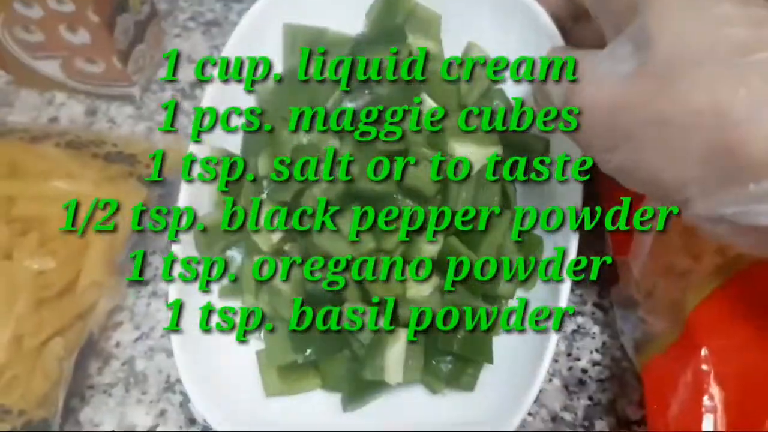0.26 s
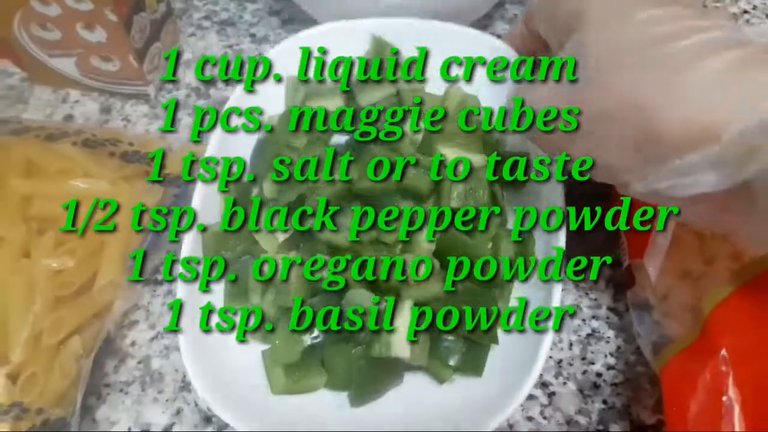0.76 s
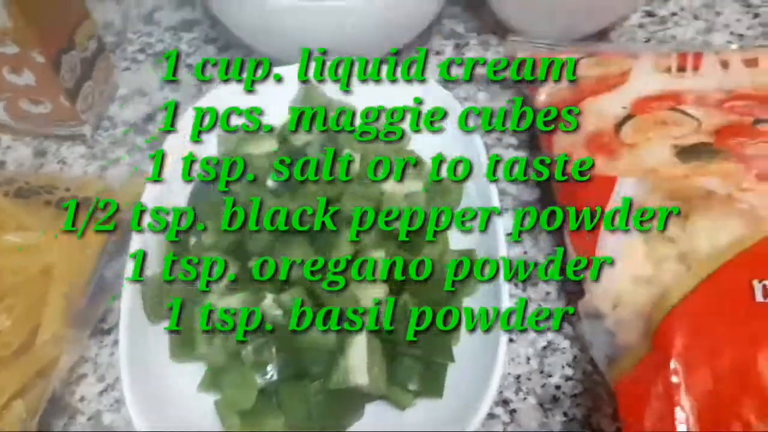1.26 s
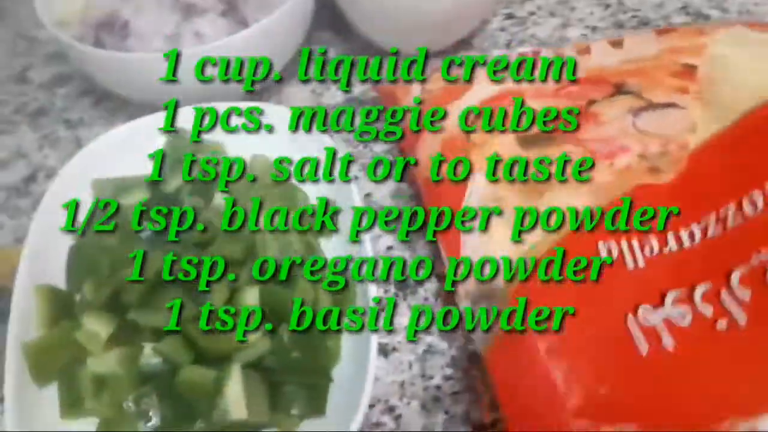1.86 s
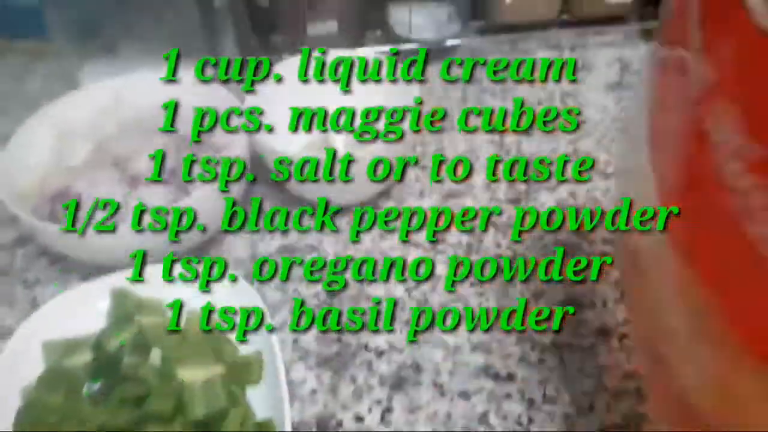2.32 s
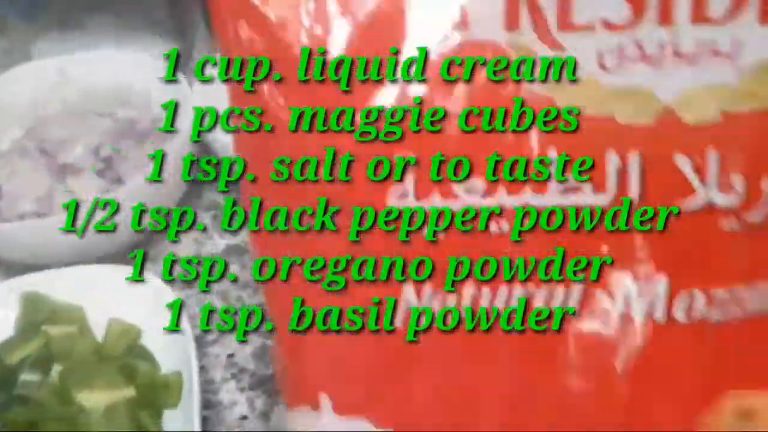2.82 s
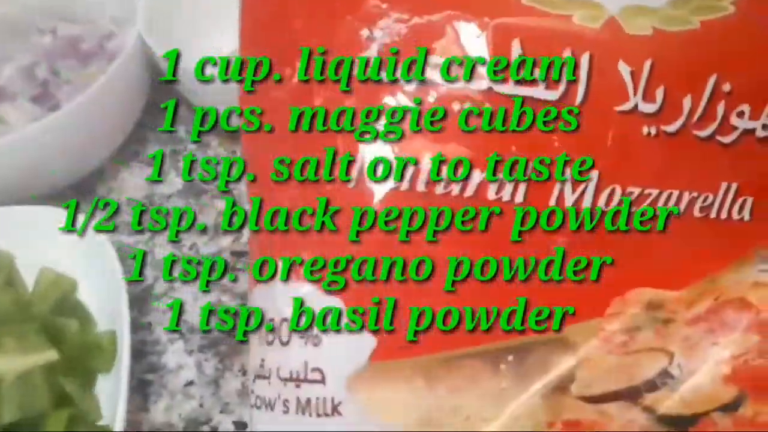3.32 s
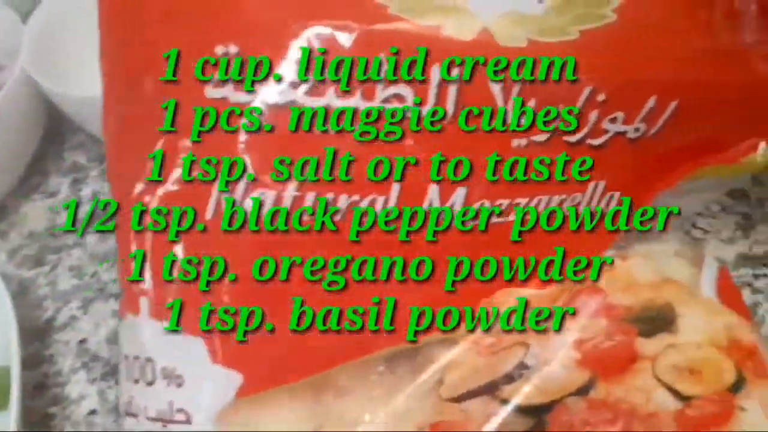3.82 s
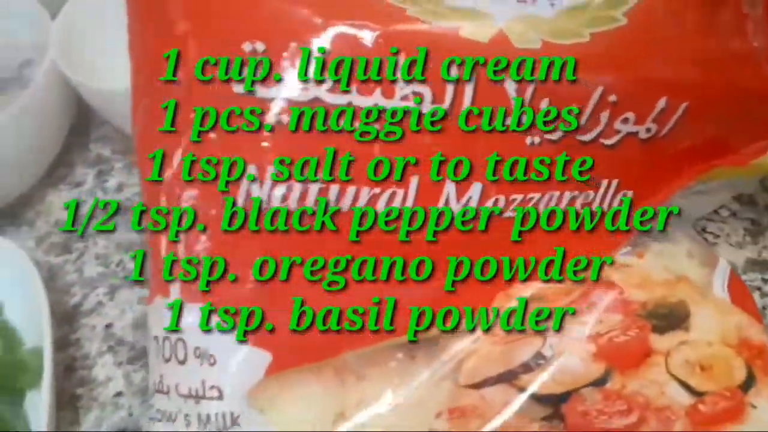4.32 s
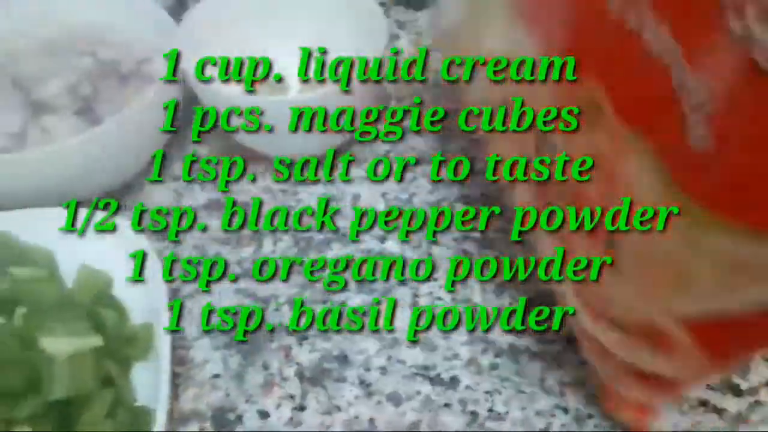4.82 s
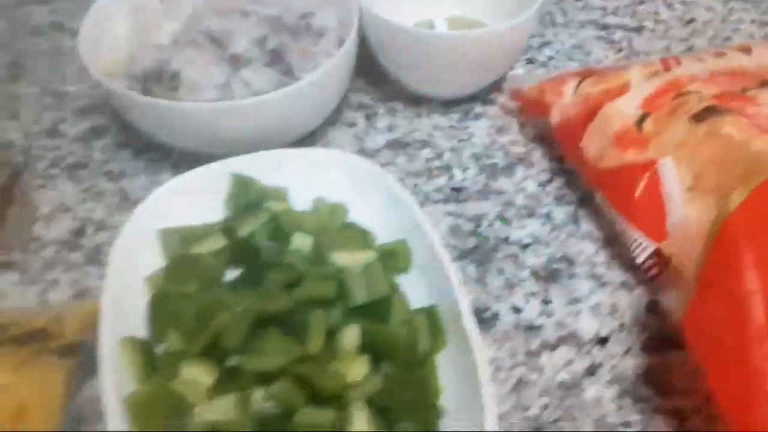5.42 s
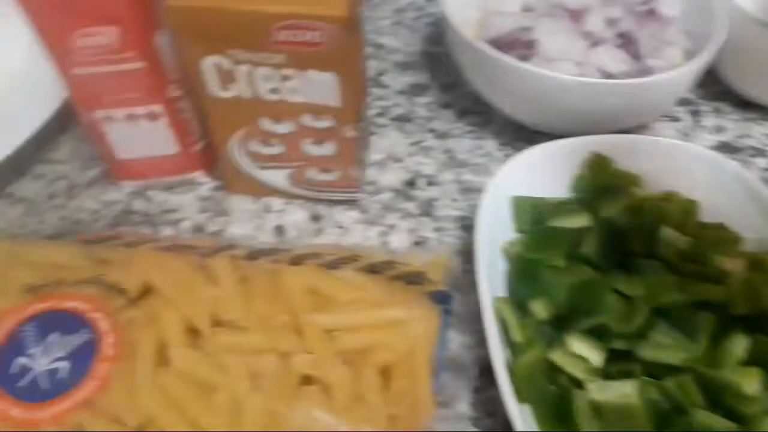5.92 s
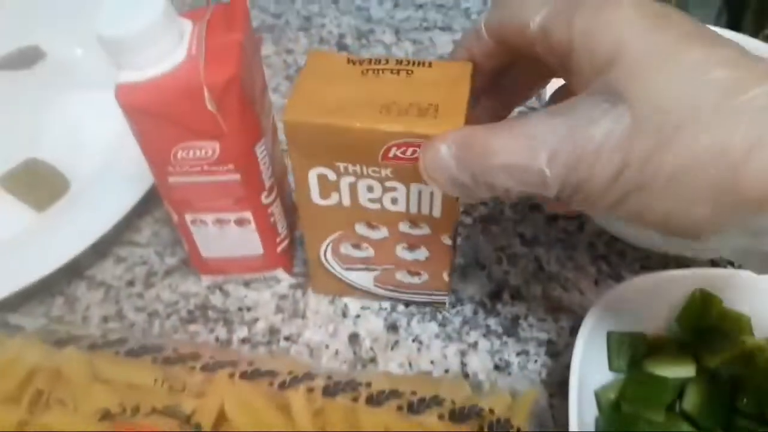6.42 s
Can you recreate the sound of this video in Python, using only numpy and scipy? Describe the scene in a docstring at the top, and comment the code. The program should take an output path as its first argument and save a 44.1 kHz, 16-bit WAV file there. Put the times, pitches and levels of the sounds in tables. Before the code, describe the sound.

Throughout about 6.6 seconds, a fridge compressor runs in a small tiled kitchen: a low, slightly wavering, beating hum with soft airy hiss and faint unsteady whines. At about 0.76 s a china dish rocks on the stone counter with a dull knock and tiny follow-ups; at 0.9 s it clinks against a bowl, bright, quickly damped, with a short room tail. Thin glove ticks come near 0.87 and 1.4 s. From about 1.75 to 3 s a filled plastic bag is gripped, crinkling with sharp snaps, fine crackle and soft inner thuds, with smooth rubbing strokes near 2.5 s. From 3.1 to 4.4 s only sparse faint pats remain over the hum. From 4.5 s the film rubs and crackles again, and at 5.08 s the bag drops with a dense crunchy crash and soft thud, settling by 5.4 s. Small ticks near 5.75 s, then hum alone. Close handheld stereo microphone, bag leaning right.

```python
"""A fridge compressor hums and hisses throughout in a small tiled kitchen: tones plus shaped noise.
Near 0.8 s a china dish rocks on stone and clinks on a bowl: damped modes and a noisy crack.
A glove gives thin ticks at 0.87, 1.41 and 5.8 s. From 1.5 s a filled plastic bag is gripped and crinkles:
scattered clicks, pitched snaps, hiss, soft thuds. From 2.5 s, and again from 4.5 s, it slips through the
gloved hand in strokes of fine crackle; at 5.08 s it drops on the counter: a dense crash of clicks and a thud."""
import sys
import numpy as np
from scipy import signal
from scipy.fft import rfft, irfft
from scipy.io import wavfile
from scipy.ndimage import uniform_filter1d

SR = 44100
rng = np.random.default_rng(int(sys.argv[2]) if len(sys.argv) > 2 else 0)


def to_wav(sig):
    """Store sig (one row per channel, or 1-D mono) as 16-bit WAV at the path in sys.argv[1].

    Samples outside -1..1 are clipped; the rate is SR.
    """
    pcm = np.clip(np.atleast_2d(sig), -1, 1) * 32767
    pcm = np.round(pcm).astype(np.int16)
    wavfile.write(sys.argv[1], SR, pcm.T)  # frames by channels


N = 294147
TIME = np.arange(N) / SR


def gain_of(db):
    """Decibels to amplitude."""
    return 10 ** (np.asarray(db) / 20)


def evened(x):
    """Scales to rms 1."""
    return x / np.sqrt(np.mean(x ** 2) + 1e-20)


def read(points, hz):
    """Interpolates a table on a log-frequency axis."""
    point_hz, value = np.transpose(points)
    return np.interp(np.log(hz + 1), np.log(point_hz + 1), value)


def bins(x):
    """Frequencies of the spectrum of x, Hz."""
    return np.fft.rfftfreq(x.shape[-1], 1 / SR)


def coloured(x, points):
    """Filters x by a spectrum in dB."""
    return irfft(rfft(x) * gain_of(read(points, bins(x))), x.shape[-1])


def passed(x, hz, kind, order=2):
    """Causal Butterworth low-pass or high-pass."""
    return signal.sosfilt(signal.butter(order, hz, kind, fs=SR, output="sos"), x)


def panned(lean_db):
    """Left and right gains; lean_db is left over right."""
    return gain_of(np.array([lean_db, -lean_db]).reshape(2, -1) / 2)


def add(mix, start_s, sound):
    """Mixes a sound in at start_s."""
    part = mix[:, round(start_s * SR):][:, :sound.shape[1]]
    part += sound[:, :part.shape[1]]


def drift(rate_hz):
    """Random wandering of rms 1: 20 sines up to rate_hz, slow ones strongest."""
    # 105 knots per s: sines above 52 Hz fold down
    knot_s = np.linspace(0, N / SR, 700)
    waves = 0
    for hz in np.geomspace(rate_hz / 10, rate_hz, 20):
        waves = waves + np.sin(2 * np.pi * (hz * knot_s + rng.random())) / np.sqrt(hz)
    return np.interp(TIME, knot_s, evened(waves))


def tone(hz, waver=0.014, fading_db=2.0):
    """One line; the shorter its wavelength, the more it wavers as the microphone moves."""
    phase = 2 * np.pi * (hz * TIME + rng.random()) + waver * np.sqrt(hz) * drift(1.998)
    fading = gain_of(fading_db * min(hz / 1000, 1) * drift(1.895))
    return fading * np.sqrt(2) * np.sin(phase)


def tones(base_hz, lines):
    """Harmonics of one repeating cycle."""
    return sum(panned(lean_db) * gain_of(db) * tone(multiple * base_hz) for multiple, db, lean_db in lines)


MAINS_HZ, SHAFT_HZ = 49.985, 47.905
# magnetic hum of the motor: (mains_multiple, level_db, lean_db)
MAINS = [(2, 0, -3.7), (4, -16.5, 1), (6, -11.5, .5), (8, -23, -3), (10, -27, -3), (12, -27, 0)]
# piston vibration: (shaft_multiple, level_db, lean_db)
PISTON = [(3, -22, -4), (5, 0, -2.2), (7, -18, -7), (8, -14.5, -4), (9, -27, -11.5), (10, -31.5, -11)]
# microphone moving through the standing waves of the room: (time_s, mains_db, piston_db)
HUM = [(0, -44.7, -40.3), (0.25, -43.0, -38.5), (0.7, -43.0, -38.4), (1.0, -45.5, -41.1),
       (1.65, -46.0, -43.9), (2.15, -45.7, -40.9), (2.45, -44.4, -43.0), (2.9, -44.9, -42.4),
       (3.4, -44.3, -44.4), (3.95, -43.0, -42.4), (4.25, -43.4, -44.8), (4.8, -43.0, -40.0),
       (5.3, -43.2, -44.0), (5.68, -43.1, -38.7), (6.12, -42.7, -39.4), (6.3, -42.3, -41.7),
       (6.6, -42.3, -38.9)]
# thin whines that swell as the microphone passes: (shaft_multiple, level_db, loudest_s, half_width_s)
WHINE = [(16, -71, 5.9, .7), (18, -70, 5.9, .6), (21, -70, 3.9, .55), (21, -68.5, 5.75, .45),
         (22, -70.5, 3.9, .9), (22, -67, 5.7, .6), (24, -66, .5, 1.2), (27, -71, .4, .7),
         (28, -72, .47, 1.2), (28, -74, 4.6, 1.6), (30, -69, 3.7, .8), (41, -78, .34, 1.1),
         (69, -78, 4.1, .6)]
WHINE_FLICKER_DB, WHINE_FLICKER_HZ = 2, 12  # the whines come and go unsteadily


def compressor():
    """Mains hum and the slightly slower piston beat against each other under a faint whine."""
    time_s, mains_db, piston_db = np.transpose(HUM)
    mains = gain_of(np.interp(TIME, time_s, mains_db)) * tones(MAINS_HZ, MAINS)
    piston = gain_of(np.interp(TIME, time_s, piston_db)) * tones(SHAFT_HZ, PISTON)
    whine = np.zeros(N)
    for multiple, level_db, loudest_s, half_width_s in WHINE:
        swell = np.exp(-((TIME - loudest_s) / half_width_s) ** 2)
        flicker = gain_of(WHINE_FLICKER_DB * drift(WHINE_FLICKER_HZ))
        whine += gain_of(level_db) * swell * flicker * tone(multiple * SHAFT_HZ, waver=0.11)
    return mains + piston + whine * panned(-2)


# rush of the running machine: (freq_hz, density_db_per_hz)
RUSH = [(25, -25), (50, -16), (75, -12), (108, 0.5), (160, 6.5), (220, -2), (315, 1), (440, -12),
        (650, -14.3), (830, -13), (1200, -14.8), (1700, -21), (3000, -25), (4800, -34), (6100, -27),
        (7600, -37.5), (10000, -41.5), (15000, -45.5)]
# ringing of the compressor shell: (freq_hz, width_hz, over_rush_db)
SHELL = [(2992, 42, 8), (3298, 48, 14), (3940, 120, 7), (5230, 57, 9), (6380, 28, 5), (8260, 200, 7)]
# left-right correlation of the rush, clipped to +-1: (freq_hz, likeness)
LIKENESS = [(60, 7.3), (130, -1.7), (300, 0.7), (640, 0.16), (1400, -0.49), (3000, 0)]
# left-right balance of the rush: (freq_hz, lean_db)
LEAN = [(110, 5), (200, 2.5), (400, -6.5), (1400, -1), (4500, -6), (8000, -1), (14000, 7.5)]


def rush(level_db=-45.0, throb=0.049, follow=0.52, ripple_db=1.06):
    """Machine noise in the room, ringing in the shell; its hiss throbs once per shaft turn."""
    a, b = rfft(rng.standard_normal((2, N)))
    hz = bins(TIME)
    same = np.clip(read(LIKENESS, hz), -1, 1)
    shell_db = sum(db / (1 + (2 * (hz - f) / width_hz) ** 2) for f, width_hz, db in SHELL)
    # countless small resonances of pipes and panels ripple the hiss
    spots_hz = np.arange(0, SR / 2, 45)
    ripple = np.interp(hz, spots_hz, rng.standard_normal(len(spots_hz)))
    panels_db = ripple_db * ripple * np.minimum(hz / 2000, 1)
    stereo = np.array([a, same * a + np.sqrt(1 - same ** 2) * b]) * panned(read(LEAN, hz))
    noise = evened(irfft(stereo * gain_of(read(RUSH, hz) + shell_db + panels_db), N))
    noise += throb * np.sin(2 * np.pi * SHAFT_HZ * TIME) * passed(noise, 1800, "high", order=1)
    # the rush partly follows the level of the mains hum
    time_s, mains_db, _ = np.transpose(HUM)
    return noise * gain_of(level_db + follow * np.interp(TIME, time_s, mains_db - mains_db.mean()))


# reverberation: (freq_hz, t60_s)
KITCHEN = [(200, 1), (1000, 1), (2500, 0.91), (6000, 0.84), (15000, 0.46)]


def kitchen(x, wet_db, early_db=-11):
    """Quick echoes off counter and tiles, then a tail that dies sooner in the treble."""
    taps = rng.standard_normal((2, SR * 2 // 3))
    hz, t, z = signal.stft(taps, SR, nperseg=256)
    decay = gain_of(-60 * t / read(KITCHEN, hz)[:, None])
    tail = signal.istft(z * decay, SR, nperseg=256)[1]
    t = np.arange(tail.shape[1]) / SR
    tail *= np.minimum(t / 0.004, 1)
    hits = rng.random(tail.shape) < 1500 / SR
    early = rng.standard_normal(tail.shape) * hits * (t > .002) * np.exp(-t / 0.0029)
    echo = 0
    for db, part in [(wet_db, tail), (early_db, early)]:
        echo = echo + gain_of(db) * part / np.linalg.norm(part, axis=1, keepdims=True)
    return x + signal.fftconvolve(x, echo, axes=1)[:, :N]


def ringing(modes, t, phase_spread=1):
    """Dying modes; phase differs per microphone by up to phase_spread turns."""
    ring = 0
    for hz, db, t60_s in modes:
        turns = hz * t + phase_spread * rng.random((2, 1))
        ring = ring + gain_of(db - 60 * t / t60_s) * np.sin(2 * np.pi * turns)
    return ring * np.minimum(t / 0.0002, 1)


def burst(t, spread_s, flutter_s, flutter_db, click_db=-5):
    """A sharp click inside a quick noise cluster, then a weaker flutter; energy 1 per channel."""
    cluster = evened(rng.standard_normal((2, len(t))) * t * np.exp(-(t / spread_s) ** 2))
    flutter = evened(rng.standard_normal((2, len(t))) * np.exp(-t / flutter_s))
    # the right click lands up to 12 samples either side of the left
    click = evened(np.array([t == t[30], t == t[rng.integers(18, 42)]]) * 1.)
    out = gain_of(click_db) * click + cluster + gain_of(flutter_db) * flutter
    return out / np.linalg.norm(out, axis=1, keepdims=True)


# dish rocking on the stone: (start_s, level_db)
KNOCKS = [(.7584, -30), (.7765, -42.5), (.7825, -46), (.7896, -44)]
# damped modes of the rocking dish: (freq_hz, level_db, t60_s)
FOOT = [(620, -13, .05), (880, -10, .05), (1020, -14, .05), (1230, -5, .035), (1360, 0, .036),
        (1490, -11, .04), (1700, -16, .04), (2590, -16, .035)]
KNOCK_CONTACT_S = .0008  # the foot meets the stone softly
# china touching china: (start_s, strength_db, ring_offset_db)
CLINKS = [(0.8938, -21.5, -16), (.8990, -31, -6.5)]
# crack of china on china: (freq_hz, density_db_per_hz)
CRACK = [(200, -8), (500, -4), (800, 0), (1400, 6.5), (2300, 5.5), (3200, 2), (4000, -7), (5300, -12),
         (9000, -18), (15000, -23)]
# modes of the china: (freq_hz, level_db, t60_s)
CHINA = [(840, -3, .25), (1007, -16, .25), (1335, -14, .3), (1440, -2, .18), (1560, -11, .3),
         (1760, -12, .3), (1870, -11, .3), (2080, -2, .6), (2230, -10, .4), (2335, -9, .4), (2470, -11, .3),
         (2590, -1, .25), (2853, -6, .3), (2970, -11, .3), (3246, -2, .26), (3354, -3, .14),
         (3795, -18, .3), (4100, -17, .3), (4290, -15, .22), (5130, -12.5, .42), (5260, -11, .15),
         (7170, -15, .3), (8120, -18, .12)]
CONTACT_S, FREE_RING_DB = .007, -10.5  # the contact damps the china quickly; a weaker ring goes on


def dish():
    """Dull knocks as the dish rocks, then a clink: a crack, a short clatter and ringing china."""
    knocks, cracks, rings = np.zeros((3, 2, N))
    t = np.arange(SR // 2) / SR
    soft = 1 - np.exp(-(t / KNOCK_CONTACT_S) ** 2)
    for start_s, level_db in KNOCKS:
        add(knocks, start_s, gain_of(level_db) * soft * ringing(FOOT, t, phase_spread=.15))
    damping = np.exp(-t / CONTACT_S) + gain_of(FREE_RING_DB)
    for start_s, strength_db, ring_offset_db in CLINKS:
        crack = burst(t, spread_s=0.0012, flutter_s=.005, flutter_db=-6, click_db=-2)
        add(cracks, start_s, gain_of(strength_db + 22) * crack)
        add(rings, start_s, gain_of(strength_db + ring_offset_db) * damping * ringing(CHINA, t))
    clink = kitchen(rings, wet_db=-9.5) + kitchen(coloured(cracks, CRACK), wet_db=-9.3)
    return kitchen(knocks, wet_db=-10) * panned(-4) + clink * panned(-1.9)


# brightness of the film as it snaps: (freq_hz, gain_db)
FILM = [(300, 8), (800, -4.5), (2000, 0), (4300, -1.5), (6000, 1), (7600, 3), (9500, -1), (15000, 1)]


def snaps(rows, level_db, treble_db=3):
    """A crease buckles in a click and lesser ones; its facet flutters briefly at its own pitch."""
    out, t = np.zeros((2, N)), np.arange(2048) / SR
    for start_s, strength_db, pitch_hz, bright_db, lean_db in rows:
        buckle = burst(t, spread_s=0.0015, flutter_s=0.006, flutter_db=-9, click_db=0.5)
        facet = passed(passed(buckle, pitch_hz * 0.37, "high"), pitch_hz * 1.8, "low")
        facet = passed(evened(facet), 6600, "low", order=5)
        ring = evened(ringing([(pitch_hz, 0, 12 / pitch_hz)], t))
        facet = evened(facet + 0.42 * ring)
        edge = gain_of(bright_db + treble_db) * evened(passed(buckle, 4000, "high", order=1))
        # the sharp edge reaches both microphones more evenly than the facet's tone
        snap = facet * panned(lean_db - 1) + edge * panned(0.41 * lean_db + 4)
        add(out, start_s, gain_of(strength_db + level_db) * evened(snap))
    return coloured(out, FILM)


# thin ticks of the glove: (start_s, strength_db, pitch_hz, treble_db, lean_db)
GLOVE = [(.8675, -34, 4200, -3, -5), (1.4145, -42, 7000, 16, -5), (5.799, -39.5, 3500, -22, -6)]


def glove():
    """Thin ticks, each buckling like a small crease."""
    return snaps(GLOVE, level_db=-20.5)


def click_sizes(per_s, spread_db):
    """Random clicks at per_s (scalar), sizes spread exponentially in dB up to 3 * spread_db."""
    hits = rng.random(N) < per_s / SR
    return hits * gain_of(spread_db * np.minimum(rng.exponential(1, N), 3))


def grains(per_s, spread_db, cycles, low_hz, high_hz, count):
    """Tiny pitched buckles; small bright ones are more frequent than large dull ones."""
    out, t = np.zeros((2, N)), np.arange(700) / SR
    pitches_hz = np.geomspace(low_hz, high_hz, count)
    for hz in pitches_hz:
        age = t * hz / cycles
        wave = np.sin(2 * np.pi * (hz * t + rng.random((2, 1))))
        grain = np.sqrt(hz) * age * np.exp(-age) * wave
        clicks = click_sizes(per_s * hz / pitches_hz.sum(), spread_db)
        out += signal.oaconvolve(clicks[None], grain, axes=1)[:, :N]
    return evened(out)


def fizz(colour, per_s, spread_db):
    """Thousands of toneless micro-clicks from all over the film merge into a fine, even crackle."""
    return evened(coloured(click_sizes(per_s, spread_db) * rng.standard_normal((2, N)), colour))


# sliding film: (freq_hz, density_db_per_hz)
SLIDE = [(1000, -4), (3500, 9), (6500, 5), (9500, 0.5), (12000, 3), (15000, 1.5)]


def sliding_hiss():
    """Sliding film: shaped noise with a slight flicker in level."""
    return evened(coloured(rng.standard_normal((2, N)), SLIDE)) * gain_of(0.9 * drift(40))


def rustle(rows, crackle, hiss, attack_s, release_db_per_s, lean_db):
    """Each move swells, holds and dies, driving the crackle and the sliding hiss."""
    crumpling, sliding = np.zeros((2, N))
    for start_s, length_s, crumple_db, slide_db in rows:
        attack = np.clip((TIME - start_s) / attack_s, 0, 1)
        shape = attack * gain_of(-release_db_per_s * np.maximum(TIME - start_s - length_s, 0))
        crumpling = np.maximum(crumpling, gain_of(crumple_db) * shape)
        sliding = np.maximum(sliding, gain_of(slide_db) * shape)
    return crumpling * crackle * panned(lean_db) + sliding * hiss * panned(.8)


# moves of the hand on the bag: (start_s, length_s, crumple_db, slide_db)
GRIPS = [(1.52, .15, -72, -64), (1.77, .22, -52, -67), (2.01, .09, -53.5, -66), (2.12, .08, -51.5, -52),
         (2.23, .21, -52, -71), (2.48, .075, -47, -64), (2.565, .09, -54, -57), (2.67, .05, -55, -66),
         (2.78, .14, -68, -71), (2.93, .22, -61.5, -72)]
# crumpling film: (freq_hz, density_db_per_hz)
CRUMPLE = [(200, -10), (420, 5.5), (600, 2), (820, 6.5), (1200, 3), (1900, -2.5), (3000, -4), (4500, -7.5),
           (6500, -9.5), (9000, -16.5), (15000, -29)]
GRIP_ATTACK_S, GRIP_RELEASE_DB_PER_S = .03, 260  # the film tightens, then relaxes


def grips(flexes, clumps, hiss):
    """Crumpling film: pitched buckles and flexing facets in clumps, plus sliding hiss."""
    buckles = grains(per_s=2600, spread_db=4.8, cycles=0.65, low_hz=450, high_hz=12030, count=16)
    crackle = evened((evened(coloured(buckles, CRUMPLE)) + gain_of(-6) * flexes) * clumps)
    return rustle(GRIPS, crackle, hiss, GRIP_ATTACK_S, GRIP_RELEASE_DB_PER_S, lean_db=-5.5)


CREASES_PER_S, CREASE_OVER_DB, CREASE_SCATTER_DB = 30, 14.5, 3
CREASE_LOW_HZ, CREASE_HIGH_HZ, CREASE_TREBLE_DB = 1000, 2400, -23
CREASE_LEAN_DB, LEAN_SCATTER_DB = -6, 4  # left-right place of the bag, and spread of its creases


def creases():
    """Random snaps during every grip, stronger the harder the film is crumpled."""
    rows = []
    for start_s, length_s, crumple_db, _ in GRIPS:
        for when, size, pitch, place in rng.random((round(CREASES_PER_S * length_s), 4)):
            strength_db = crumple_db + CREASE_OVER_DB + CREASE_SCATTER_DB * (2 * size - 1)
            pitch_hz = CREASE_LOW_HZ * (CREASE_HIGH_HZ / CREASE_LOW_HZ) ** pitch
            lean_db = CREASE_LEAN_DB + LEAN_SCATTER_DB * (2 * place - 1)
            rows.append((start_s + when * length_s, strength_db, pitch_hz, CREASE_TREBLE_DB, lean_db))
    return snaps(rows, level_db=-19)


# snaps and faint pats of the film: (start_s, strength_db, pitch_hz, treble_db, lean_db)
SNAPS = [(1.798, -31.0, 1600, -10, -3), (1.803, -28.0, 1510, -9, -5), (1.871, -33.0, 2600, -25, -7),
         (1.889, -25.5, 1700, -9, -11), (1.942, -35.5, 3100, -2, -9), (1.953, -29.5, 3200, -17, -7),
         (1.974, -34.0, 1700, -28, -7), (2.1, -31.5, 1920, -26, -8), (2.125, -22.5, 4000, -9, -8),
         (2.143, -27.5, 1320, -15, -10), (2.167, -29.0, 3500, -14, -8), (2.179, -31.0, 3000, -20, -7),
         (2.226, -21.5, 4300, -7, -7), (2.255, -28.5, 1280, -28, -6), (2.269, -35.0, 2400, -21, -3),
         (2.318, -22.5, 1980, -16, -6), (2.349, -29.0, 1600, -29, -7), (2.384, -29.0, 1090, -12, -6),
         (2.47, -32.0, 6500, -6, -11), (2.487, -32.0, 3200, -24, -5), (2.498, -30.5, 1520, -11, -6),
         (2.514, -28.0, 1800, -10, -7), (2.531, -27.5, 3200, -23, -10), (2.537, -26.0, 4800, -22, -9),
         (2.545, -28.0, 3800, -26, -10), (2.565, -18.5, 4600, -13, -11), (2.675, -27.0, 1400, -10, -10),
         (2.706, -34.5, 5500, -9, -9), (2.723, -35.5, 5300, -28, -2), (2.731, -30.0, 1360, -13, -5),
         (2.853, -35.5, 1390, -11, -5), (2.984, -24.0, 2700, -18, -8), (2.998, -32.5, 1500, -33, -5),
         (3.135, -36.0, 1950, -28, -5), (3.165, -38.0, 1200, -27, -8), (3.245, -41.0, 3000, -31, -6),
         (3.534, -43.0, 1700, -32, -6), (3.608, -40.0, 1400, -34, -4), (3.708, -41.5, 1200, -33, -7),
         (4.503, -32.5, 1800, -27, -2), (4.513, -32.0, 1410, -15, -4), (4.708, -29.5, 1460, -19, -3),
         (4.742, -29.0, 1500, -13, -5), (4.757, -30.5, 1700, -18, 1), (4.794, -34.0, 1400, -13, -6),
         (4.839, -26.0, 2400, -10, -4), (4.878, -34.5, 1460, -9, -1), (4.931, -24.0, 4800, -19, -12),
         (4.964, -37.5, 4520, -13, -3), (5.089, -26.5, 2450, -7, -5), (5.103, -24.5, 1500, -19, -4),
         (5.109, -22.0, 1200, -22, -6), (5.12, -28.5, 2800, -24, -5), (5.131, -18.0, 4500, -1, -7),
         (5.138, -24.5, 2300, -11, -3), (5.169, -27.0, 1100, -13, -5), (5.186, -30.5, 4200, -12, -5),
         (5.217, -31.0, 3500, -27, -7), (5.234, -33.0, 4800, -25, -7), (5.312, -29.5, 1300, -12, -9),
         (5.725, -33.0, 1300, -24, -7)]


def timed_snaps():
    """Snaps and faint pats of buckling film at set times and pitches."""
    return snaps(SNAPS, level_db=-19)


# contents slumping inside the bag: (start_s, level_db, length_s)
SLUMPS = [(2.419, -45, .13), (2.5, -46, .1), (2.57, -49, .12), (4.69, -46, .11), (5.096, -38, .04)]
# thud spectrum: (freq_hz, density_db_per_hz)
SLUMP_COLOUR = [(30, -16), (110, 12.5), (170, 2.5), (340, 10), (600, -4), (850, -3), (2500, -17.5),
                (8000, -58)]


def slumps():
    """The loose filling shifts and lands with a soft thud: a swell of low noise."""
    out, t = np.zeros((2, N)), np.arange(SR // 3) / SR
    for start_s, level_db, length_s in SLUMPS:
        swell = np.exp(-(2 * (t - length_s / 2) / length_s) ** 2)
        thud = evened(coloured(rng.standard_normal(len(t)) * swell, SLUMP_COLOUR))
        thud *= np.sqrt(np.mean(swell ** 2)) * np.clip((2 * length_s - t) / length_s, 0, 1)
        add(out, start_s, gain_of(level_db) * panned(-6) * thud)
    return out


# smooth strokes of the bag through the glove: (start_s, length_s, rub_db, slide_db)
SLIPS = [(2.495, .06, -49, -70), (2.56, .095, -48.5, -66), (4.485, .10, -50, -62), (4.55, .08, -52, -55),
         (4.62, .09, -45.5, -54.5), (4.72, .08, -52, -63), (4.81, .26, -59, -65), (5.18, .07, -51, -70),
         (5.28, .06, -54, -69)]
# rubbing film: (freq_hz, density_db_per_hz)
RUB = [(200, -6), (450, 3), (850, 4.5), (1900, 1), (3000, -5), (4500, -10), (6500, -12), (9000, -18),
       (15000, -26)]


def slips(flexes, clumps, hiss):
    """Film rubbing through the glove: toneless fizz and flexing facets, plus sliding hiss."""
    rub = evened((fizz(RUB, per_s=2600, spread_db=3.6) + gain_of(-4.5) * flexes) * clumps)
    return rustle(SLIPS, rub, hiss, GRIP_ATTACK_S, GRIP_RELEASE_DB_PER_S, lean_db=-3.8)


# bag meeting the counter: (start_s, length_s, crumple_db, slide_db)
LANDING = (5.08, .05, -38, -50)
# whole film buckling at once: (freq_hz, density_db_per_hz)
CRASH = [(200, -4), (400, 6.5), (620, 1), (820, 7), (1300, 3), (2200, 0.5), (3200, -1.5), (4500, -4),
         (6500, -7), (9000, -16), (15000, -26)]
LAND_ATTACK_S, SETTLE_DB_PER_S = .017, 104


def landing(flexes, hiss):
    """The whole film buckles at once as the bag lands, then settles."""
    crash = evened(fizz(CRASH, per_s=4500, spread_db=4) + gain_of(-9) * flexes)
    return rustle([LANDING], crash, hiss, LAND_ATTACK_S, SETTLE_DB_PER_S, lean_db=-5.3)


CLUMP_DB, CLUMP_HZ = 1.8, 70  # one buckle sets off its neighbours: crackle in clumps


def scene():
    """The machine runs throughout; dish and bag sound close by in the kitchen."""
    machine, china = compressor() + rush(), dish()
    # larger facets flex more rarely and ring a little longer
    flexes = grains(per_s=320, spread_db=3.0, cycles=2.4, low_hz=1150, high_hz=2800, count=12)
    clumps = gain_of(CLUMP_DB * drift(CLUMP_HZ))
    hiss = sliding_hiss()
    bag = glove() + grips(flexes, clumps, hiss) + creases() + timed_snaps()
    bag += slumps() + slips(flexes, clumps, hiss) + landing(flexes, hiss)
    return machine + china + kitchen(bag, wet_db=-14.5, early_db=-13.5)


LIMIT_DB, LIMIT_RATIO, RECOVER_DB_PER_S = -17, 1.8, 80
EDGE_HZ = 15650


def record(dry):
    """A limiter ducks everything for a moment after a sharp peak; then a low-pass band limit."""
    peak_db = 20 * np.log10(abs(dry).max(0) + 1e-9)
    over_db = np.maximum(peak_db - LIMIT_DB, 0) * (1 - 1 / LIMIT_RATIO)
    fall_db = RECOVER_DB_PER_S * TIME
    duck_db = uniform_filter1d(np.maximum.accumulate(over_db + fall_db) - fall_db, size=64)
    band = signal.firwin(401, EDGE_HZ, window=("kaiser", 9), fs=SR)
    return signal.oaconvolve(dry * gain_of(-duck_db), band[None], "same")


dry = scene()
out = record(dry)
to_wav(out)
```